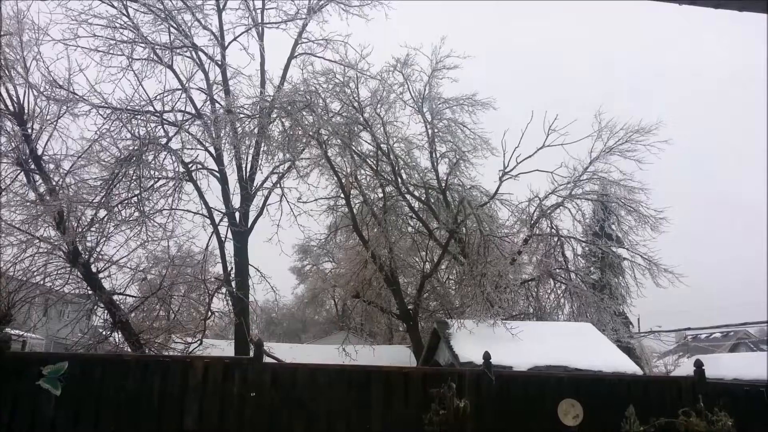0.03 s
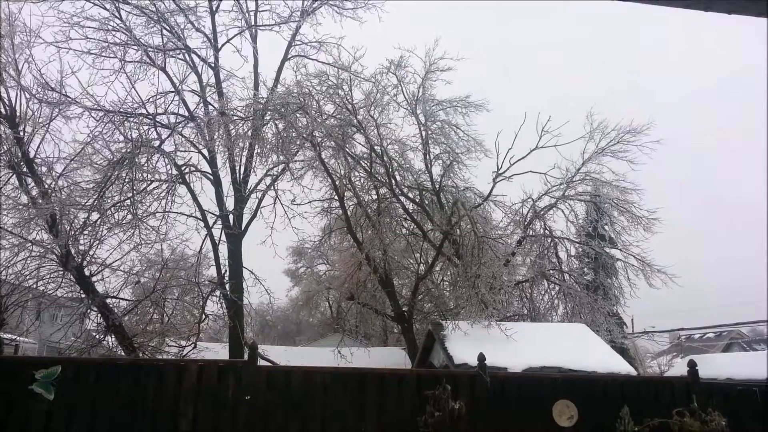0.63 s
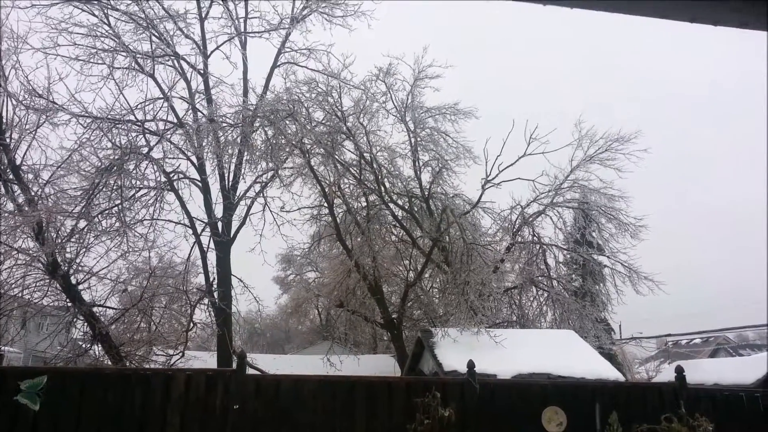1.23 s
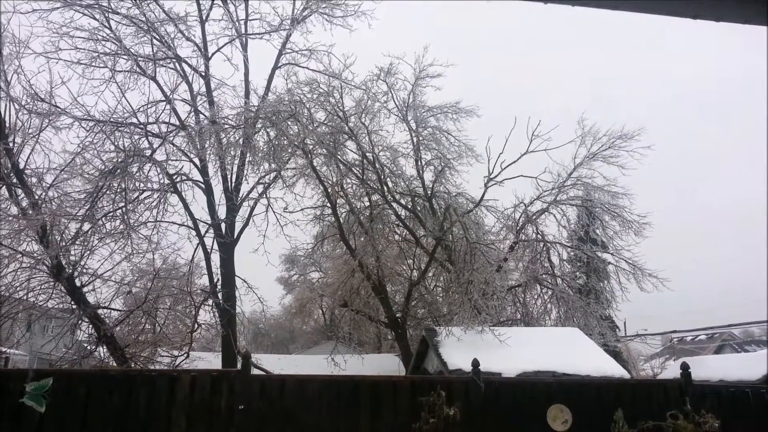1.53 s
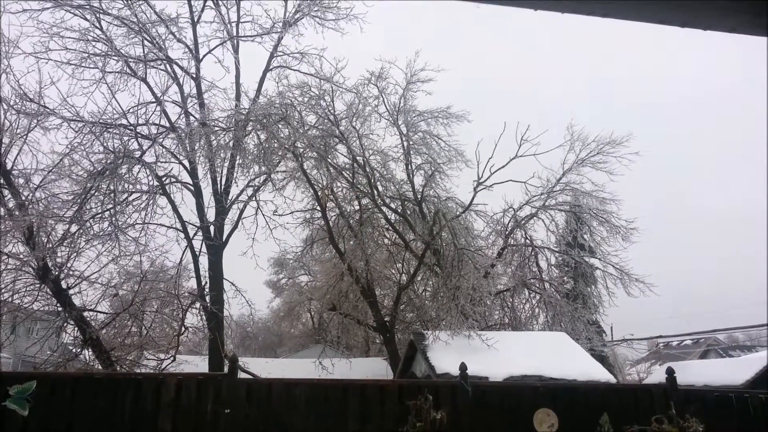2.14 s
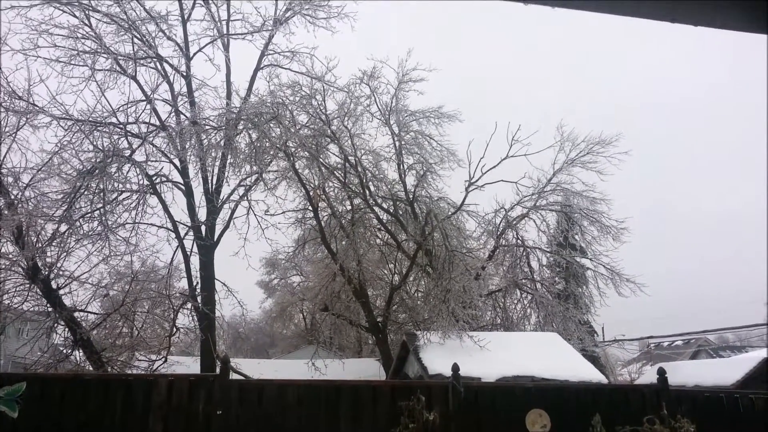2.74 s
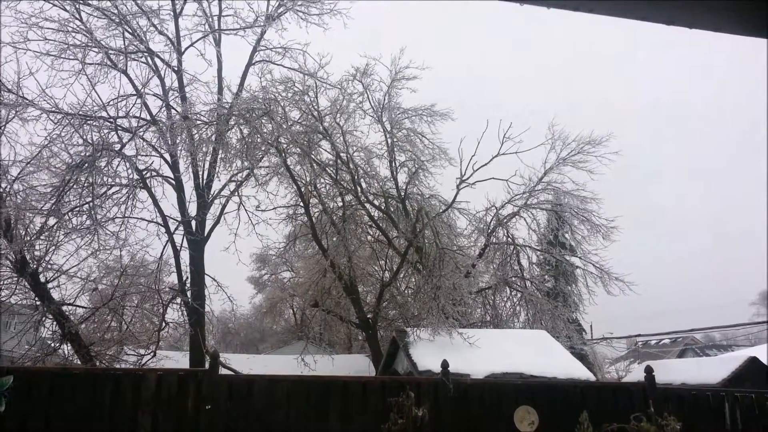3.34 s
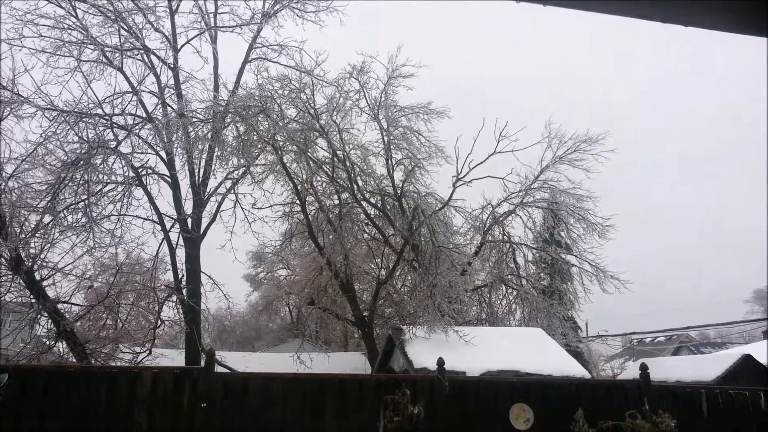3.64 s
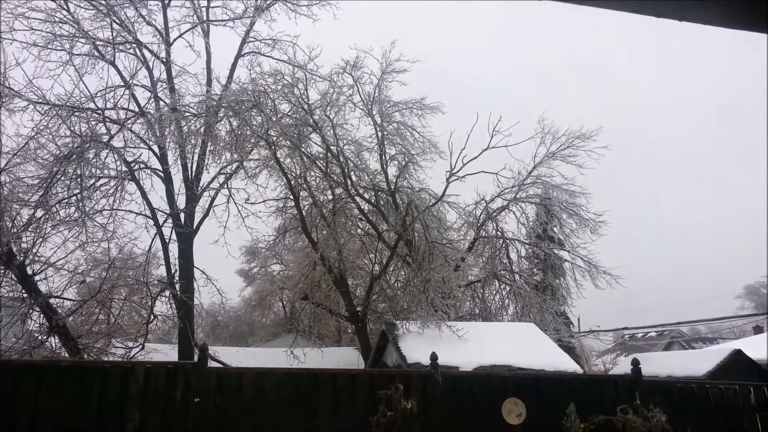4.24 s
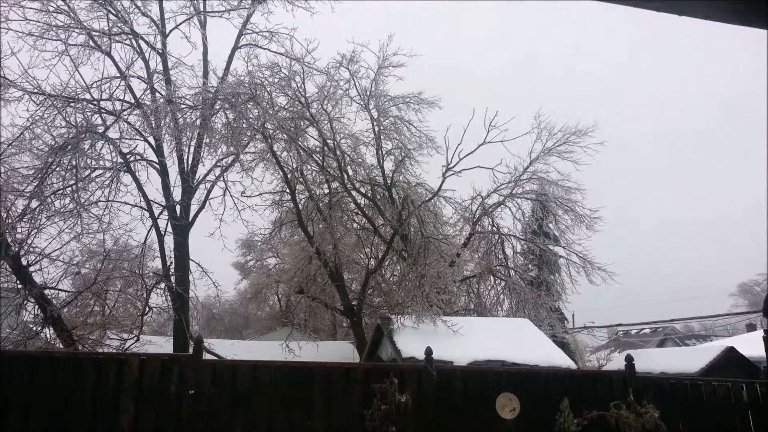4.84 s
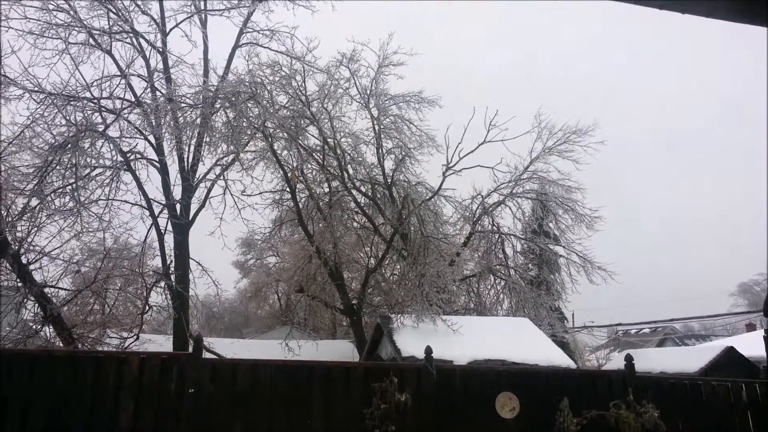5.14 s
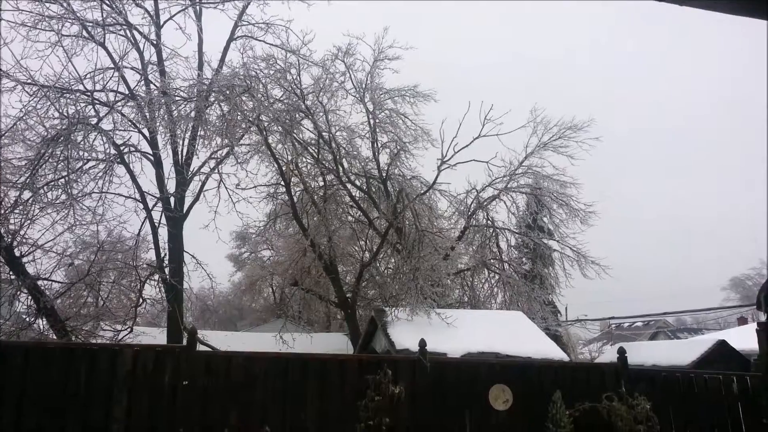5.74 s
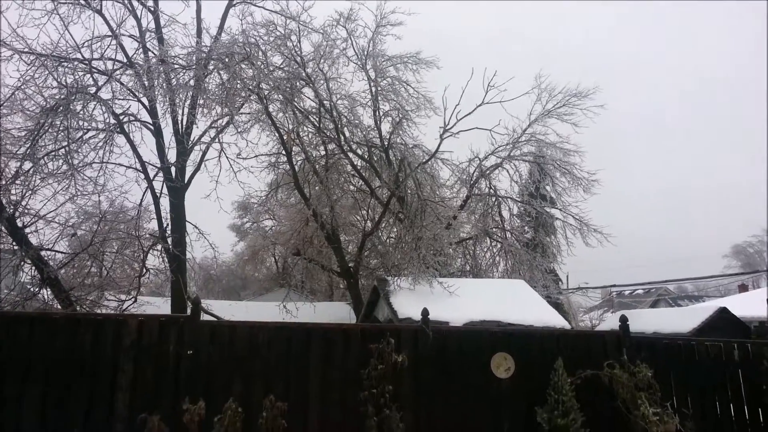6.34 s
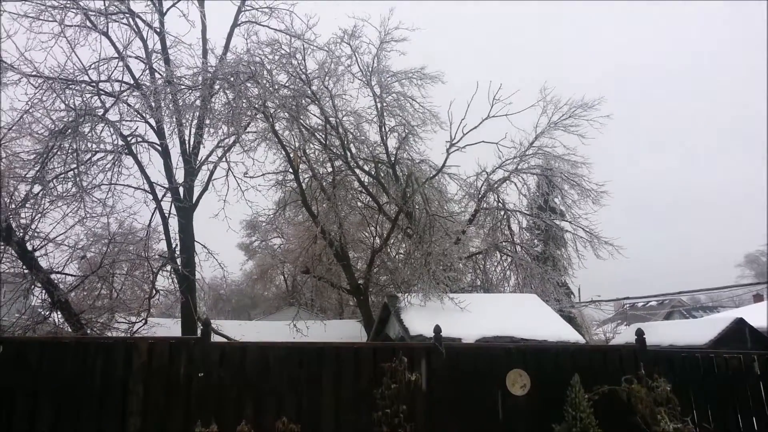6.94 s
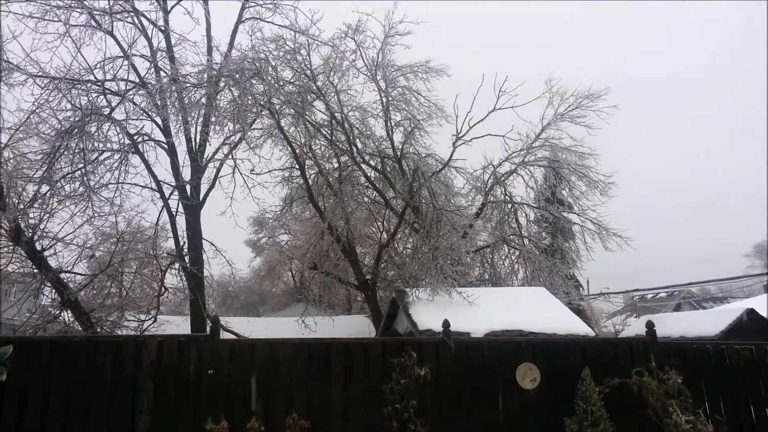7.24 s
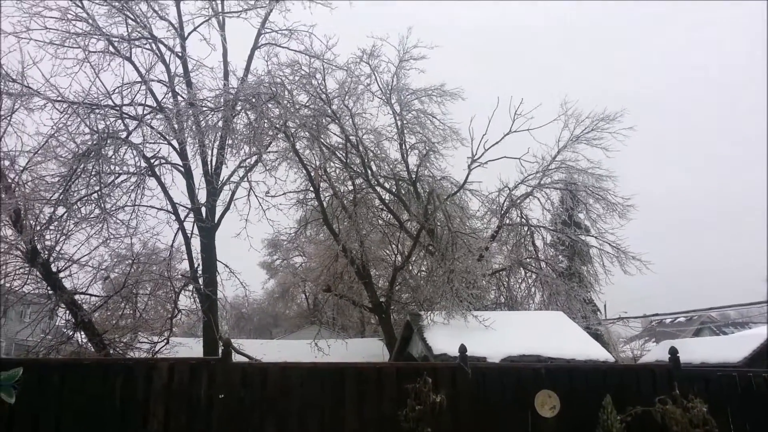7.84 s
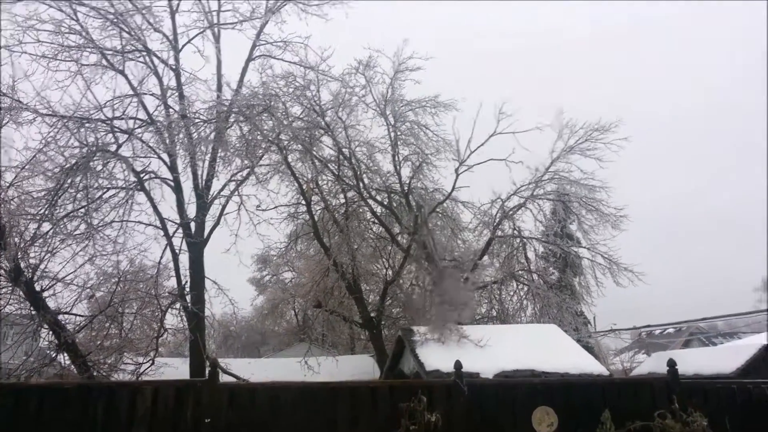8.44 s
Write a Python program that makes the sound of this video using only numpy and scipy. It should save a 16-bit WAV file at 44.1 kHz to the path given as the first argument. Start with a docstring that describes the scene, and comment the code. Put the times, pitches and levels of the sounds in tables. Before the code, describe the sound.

Sharp wood cracks echo over a faint hiss, followed by snapping icy twigs, soft thuds and one loud tearing limb break.

```python
"""Icy trees breaking behind a back yard

Heavy limbs glazed by freezing rain crack three times, the last one tearing away fibre by fibre.
In between, iced twigs snap, the glaze crackles, pellets tick and lumps of ice thud on a hollow roof.
The yard echoes the breaks, and a far engine drones faintly for a while. The left microphone port
(its sound hole) is open; the right one is covered, hears little but bass and is bumped by a finger."""
import sys
import numpy as np
from scipy import signal
from scipy.fft import rfft, irfft
from scipy.io import wavfile

SR = 44100
rng = np.random.default_rng(int(sys.argv[2]) if len(sys.argv) > 2 else 0)


def pcm_store(signal):
    """Save signal as 16-bit PCM."""
    levels = np.round(np.clip(np.atleast_2d(signal), -1, 1) * 32767)
    wavfile.write(sys.argv[1], SR, levels.astype(np.int16).T)


N = 374409

# The strongest fractures in a limb. Each row: start in seconds, level in dB, pitch in Hz.
LIMB_CRACKS = [(1.3228, -5.5, 2250), (1.3263, -6.5, 3080), (1.3345, -6.5, 2100), (1.3375, -9.5, 2680),
               (1.3629, -6.5, 2740), (1.3745, -10, 2650), (1.9445, -10, 2580), (1.9475, -12, 2720),
               (2.0484, -18, 2740), (4.2977, -20, 2190), (4.3009, -23, 2870), (4.3381, -23, 2490),
               (8.1328, -6, 1630), (8.1385, -2, 2000), (8.1523, -3, 2080), (8.1577, -5, 2060),
               (8.1688, -8, 1940), (8.1928, -7, 2520), (8.3186, -15, 2250), (8.3272, -8, 2230),
               (8.3666, -12, 2480), (8.4354, -14, 2240)]
# Breaks that shake the whole limb. Each row: start in seconds, ring level in dB, overload thud in dB.
DEEP_BREAKS = [(1.322, -32, -40), (1.334, -29, -34), (8.1255, -22, -40), (8.134, -10.5, -32)]
# Spells of tearing wood. Each row: start in seconds, level in dB, length in seconds.
TEARS = [(1.315, -21, 0.03), (1.938, -23.5, 0.031), (2.044, -29.5, 0.17), (8.127, -7, 0.029),
         (8.212, -19, 0.064), (8.32, -13.5, 0.05), (8.421, -18.5, .06)]
# Iced twigs snapping. Each row: start in seconds, level in dB, pitch in Hz,
# glassy edge in dB compared with the snap.
TWIG_SNAPS = [(1.712, -32, 2600, -18), (1.774, -35.5, 2720, -20), (1.836, -38.5, 3220, -16),
              (2.0784, -26.5, 2570, -14), (2.1345, -22.5, 3370, -17), (2.613, -32, 2700, -28),
              (2.635, -29, 2430, -35), (2.8964, -31.5, 2330, -33), (3.0303, -36, 2700, -34),
              (3.17, -30, 2650, -28), (3.1797, -27.5, 2310, -26), (3.2602, -9.5, 3240, -22),
              (3.4445, -10, 3080, -46), (3.5316, -30, 3000, -15), (3.5688, -31.5, 2540, -26),
              (3.6667, -32, 3470, -26), (3.878, -33, 3300, -41), (3.8867, -33, 3600, -14.5),
              (3.93, -17, 4000, -27), (4.3911, -31, 3570, -29), (4.4375, -29.5, 3500, -23),
              (4.5441, -28.5, 3450, -23), (4.6162, -20, 3660, -21), (5.1842, -30.5, 2830, -20),
              (5.369, -34.5, 3900, -15), (5.4958, -32, 3880, -11), (5.55, -33, 3400, -23),
              (5.6817, -31.5, 3450, -23), (5.736, -17.5, 4060, -19), (5.7954, -32, 3060, -20),
              (6.1268, -17.5, 3860, -10.5), (6.2229, -22, 4100, -19), (6.5947, -27.5, 4200, -18.5),
              (6.784, -16, 3800, -17.5), (7.1001, -38.5, 3780, -15)]
# Steady crackling of the glaze, swelling after the first breaks. Each row: time in seconds, level in dB.
CRACKLE_LEVELS = [(0.35, -60), (1.3, -59.5), (1.42, -58), (1.78, -42.5), (1.88, -48), (2.35, -45),
                  (2.58, -34.5), (2.85, -43.5), (3.55, -38.5), (4.03, -38.5), (4.2, -41.5), (4.7, -45),
                  (5.18, -42), (6.5, -45), (7.5, -45.5), (8.0, -41.5)]
# The nearest ice pellets landing. Each row: start in seconds, level in dB.
PELLETS = [(0.2866, -46), (0.4182, -48), (0.597, -49), (1.627, -43), (2.0484, -40), (2.152, -43),
           (2.2516, -38), (3.194, -40), (3.4965, -41), (4.0232, -43), (4.1326, -35), (5.3834, -35),
           (5.7686, -37), (5.9209, -45), (6.0182, -42), (6.1764, -43), (6.2097, -39), (6.2424, -40),
           (6.3069, -43), (6.5382, -36), (6.7485, -44), (6.882, -41), (7.4086, -44), (7.4623, -44),
           (7.5615, -46), (7.6624, -30), (7.9537, -46), (8.0806, -32)]
# Lumps of ice hitting the roof. Each row: start in seconds, boom level in dB, clatter level in dB.
ROOF_THUDS = [(0.519, -48.5, -50), (0.779, -41.5, -73), (1.584, -45.5, -50), (2.192, -44.5, -44.5),
              (2.4, -39.5, -38.5), (2.929, -45, -49.5), (3.358, -44.5, -54), (3.72, -47.5, -50),
              (3.96, -43, -44.5), (4.012, -55, -44), (4.159, -47, -46), (4.317, -50.5, -51),
              (4.361, -45.5, -49), (4.628, -50.5, -50), (5.078, -44.5, -52), (5.879, -46, -54),
              (6.813, -47, -54), (6.898, -46.5, -49), (7.798, -59, -49), (7.978, -46, -48.5),
              (8.36, -30.5, -44), (8.394, -37.5, -46)]
# A finger bumping the covered port. Each row: start in seconds, peak level in dB.
FINGER_BUMPS = [(1.083, -31), (6.095, -31), (6.1004, -23.5)]
# The far engine swelling and fading. Each row: time in seconds, level in dB.
ENGINE_LEVELS = [(5.9, -80), (6.2, -59), (6.8, -66), (7.6, -74), (8.0, -78)]

# The notes a struck object rings at. Each row: pitch in Hz, level in dB, seconds to fade by 60 dB.
LIMB_MODES = [(610, -3, .035), (760, -6, .035), (1018, -1, .07), (1220, -11, .1), (1547, -11, .1),
              (1955, -5, .1)]
ROOF_MODES = [(166, 0, .13), (200, 0, .14), (228, -5, .1), (273, -2.5, .16), (318, -11, .08)]
# How long the yard echoes. Each row: frequency in Hz, seconds to fade by 60 dB.
YARD_FADE_TIMES = [(200, 0.45), (1000, 0.64), (2500, 0.74), (6000, 0.45), (14000, 2.43)]

# Tone curves, from bass to treble. Each row: frequency in Hz, level in dB.
WOOD_TONE = [(40, -29), (200, -41), (500, -18), (900, 1.5), (1400, 6.5), (2000, 4), (3000, -2.5), (4000, 2),
             (5200, -13), (7500, -18), (11000, -13), (15000, -25)]  # thick wood cracking
FIBRE_TONE = [(60, -63), (400, 2.5), (900, -5.5), (1400, 1), (2100, 6), (3000, 4.5), (4000, -1.5),
              (5300, -10.5), (8000, -12.5), (11000, -24), (15000, -24)]  # wood fibres tearing
TWIG_TONE = [(100, -47), (900, -18), (1500, -2.5), (2300, 0), (4100, -2), (4800, -1.5), (5800, -10),
             (15000, -70)]  # a thin twig snapping
SHARD_TONE = [(300, -35), (2500, -11), (4000, -3), (5600, -1.5), (7500, 2), (9500, 0.5), (11500, -8),
              (14500, -5)]  # the ice coat bursting off a twig
GLAZE_TONE = [(80, -15.5), (400, -4.5), (900, -5), (1400, -4), (2100, 1), (3000, -2), (3900, 1), (4700, -8),
              (5700, -16), (8000, -15), (11000, -21), (15000, -19)]  # ice crackling in the treetops
GLASSY_TONE = [(300, -35), (2500, -13), (4000, -5), (5600, -6), (7500, 0), (10000, 0), (14500, -2)]  # pellets landing, and the treble sizzle
CLATTER_TONE = [(60, -44), (150, 1), (400, -5), (650, 16.5), (1400, 8.5), (2200, 10), (4000, -17),
                (9000, -65)]  # a lump of ice breaking up
OPEN_AIR_TONE = [(20, -52), (60, -17), (120, -13.5), (240, -4.5), (400, -10.5), (1000, -11.5), (2500, -13),
                 (4000, -16), (6000, -31), (10000, -26), (14500, -25)]  # background at the open port
COVERED_AIR_TONE = [(20, -31), (60, -5.5), (120, 2.5), (250, -5.5), (500, -10), (1000, -17.5),
                    (2500, -23.5), (4000, -24.5), (6000, -29), (10000, -26), (14500, -26.5)]  # background at the covered port
COVER_MUFFLING = [(30, -8), (160, 0), (300, -4), (600, -10), (1000, -14), (1400, -22), (2000, -35),
                  (3500, -37), (6000, -35), (15000, -37)]  # the covered port compared with the open one

TEAR_ATTACK_S, TEAR_SAG_DB_PER_S, TEAR_RELEASE_DB_PER_S = .005, 60, 299
STRAY_FIBRES_DB, STRAY_RELEASE_DB_PER_S = -12, 47
FLURRY_DB, FLURRY_ATTACK_S, FLURRY_RELEASE_DB_PER_S = -12, 0.022, 89  # level relative to the scatter
SIZZLE_DB, SIZZLE_ATTACK_S, SIZZLE_RELEASE_DB_PER_S = -77, .08, 9
START_S, CUTOFF_HZ = .1, 14500


def limb_cracks():
    """Thick wood breaks with a low crack, a few vibrations long, that scatters through the treetop."""
    out = np.zeros(N)
    for s, db, hz in LIMB_CRACKS:
        fracture = resonate(rupture(.0013, splinter_db=4), hz, width_hz=1020)
        shower = resonate(burst(0.019, uneven_db=15.5), hz, width_hz=710)
        direct = level_one(colour(fracture, WOOD_TONE), over_s=0.0029)
        scatter = level_one(colour(shower, WOOD_TONE), over_s=0.002)
        add(out, s, from_db(db) * (direct + from_db(-6) * scatter))
    return out


def deep_breaks():
    """The limb rings like a log as its core gives way; a low thud imitates the recorder overloading."""
    out = np.zeros(N)
    for s, ring_db, overload_db in DEEP_BREAKS:
        blow = rupture(0.001, splinter_db=20)
        ringing = level_one(ring(blow, LIMB_MODES), over_s=0.03)
        overload_thud = level_one(resonate(blow, 170, width_hz=300), over_s=.005)
        add(out, s, from_db(ring_db) * ringing + from_db(overload_db) * overload_thud)
    return out


def tearing():
    """Fibre after fibre gives way: each tear weakens as the strain is spent, then a few strays follow."""
    fibres = grains(6000, spread_db=3.4, clump_db=2.0, width_hz=1800)
    power = np.zeros(N)
    for s, db, length_s in TEARS:
        tear = envelope(s, TEAR_ATTACK_S, TEAR_RELEASE_DB_PER_S, length_s, TEAR_SAG_DB_PER_S)
        strays = from_db(STRAY_FIBRES_DB) * envelope(s, TEAR_ATTACK_S, STRAY_RELEASE_DB_PER_S)
        power += from_db(db) ** 2 * (tear ** 2 + strays ** 2)
    return np.sqrt(power) * rms_one(colour(fibres, FIBRE_TONE))


def twig_snaps():
    """A thin twig rings for an instant, its ice adds a glassy edge and nearby twigs scatter the snap."""
    out = np.zeros(N)
    for s, db, hz, edge_db in TWIG_SNAPS:
        fracture = resonate(rupture(.0006, splinter_db=-3), hz, width_hz=730)
        shards = rupture(.008, splinter_db=3)
        shower = resonate(burst(0.015, uneven_db=7), hz, width_hz=1450)
        direct = level_one(colour(fracture, TWIG_TONE), over_s=0.0035)
        edge = level_one(colour(shards, SHARD_TONE), over_s=0.02)
        scatter = level_one(colour(shower, TWIG_TONE), over_s=0.032)
        snap = from_db(db) * (direct + from_db(edge_db) * edge)
        add(out, s, snap + from_db(scatter_db(db)) * scatter)
    return out


def scatter_db(snap_db):
    """A harder snap stirs the nearby twigs more, but not in proportion."""
    return -20 + 0.71 * snap_db


def glaze_crackling():
    """Ice cracks all over the swaying treetops, with a flurry after each snap; far trees just hiss."""
    near = grains(2200, spread_db=2.0, clump_db=5.0, width_hz=810)
    far = rng.standard_normal(N) * from_db(drift(25))
    trees = near + from_db(-1.5) * far
    power = from_db(in_time(CRACKLE_LEVELS)) ** 2
    for s, db, *_ in TWIG_SNAPS:
        flurry = envelope(s, FLURRY_ATTACK_S, FLURRY_RELEASE_DB_PER_S)
        power += (from_db(scatter_db(db) + FLURRY_DB) * flurry) ** 2
    return np.sqrt(power) * rms_one(colour(trees, GLAZE_TONE))


def pellets():
    """Hard little grains of ice land with a bright tick and skitter."""
    out = np.zeros(N)
    for s, db in PELLETS:
        tick = colour(rupture(.008, splinter_db=2), GLASSY_TONE)
        add(out, s, from_db(db) * level_one(tick, over_s=.007))
    return out


def roof_thuds():
    """A lump of ice breaks up as it lands: the hollow roof booms under a short clatter."""
    out = np.zeros(N)
    soft_start = 1 - np.exp(-np.arange(6000) / SR / .0025)
    for s, boom_db, clatter_db in ROOF_THUDS:
        boom = ring(soft_start * burst(0.0099, uneven_db=3.5), ROOF_MODES)
        clatter = colour(soft_start * burst(0.012, uneven_db=8), CLATTER_TONE)
        add(out, s, from_db(boom_db) * level_one(boom, over_s=0.046))
        add(out, s, from_db(clatter_db) * level_one(clatter, over_s=0.1))
    return out


def finger_bumps():
    """A finger knocks dully against the covered port."""
    out = np.zeros(N)
    for s, db in FINGER_BUMPS:
        touch = rupture(0.0016, splinter_db=-41)
        knock = colour(resonate(touch, 430, width_hz=2000), COVER_MUFFLING)
        add(out, s, from_db(db) * knock / np.abs(knock).max())
    return out


def treble_sizzle():
    """A faint high hiss lingers after each tear."""
    power = sum(envelope(s, SIZZLE_ATTACK_S, SIZZLE_RELEASE_DB_PER_S) ** 2 for s, *_ in TEARS)
    hiss = grains(5000, spread_db=2.0, clump_db=2.0, width_hz=4000)
    return from_db(SIZZLE_DB) * np.sqrt(power) * rms_one(colour(hiss, GLASSY_TONE))


def sleet():
    """Fainter pellets land all around, blurred by distance."""
    ticks = grains(60, spread_db=11.0, clump_db=6.5, width_hz=1800)
    blurred = signal.oaconvolve(ticks, burst(0.008, uneven_db=4))[:N]
    return from_db(-72.0) * rms_one(colour(blurred, GLASSY_TONE))


def yard_echoes(x, bands=8):
    """Trees, fences and houses send back grainy echoes; each band of pitches fades at its own speed."""
    t = np.arange(SR) / SR
    edges_hz = np.geomspace(80, 17000, bands + 1)
    echo_sizes = from_db(4.5 * np.repeat(rng.standard_normal(SR), 40)[:SR])
    tail = np.zeros(SR)
    for low, high in zip(edges_hz, edges_hz[1:]):
        band_pass = signal.butter(2, [low, high], "band", fs=SR, output="sos")
        band = signal.sosfilt(band_pass, echo_sizes * rng.standard_normal(SR))
        fade_s = at_hz(YARD_FADE_TIMES, np.sqrt(low * high))
        tail += band * np.exp(-np.log(1000) * t / fade_s)
    tail *= 1 - np.exp(-t / 0.0034)  # the echoes take a moment to build up
    return signal.oaconvolve(x, tail / np.linalg.norm(tail))[:N]


def far_engine():
    """Only the lowest note of the engine carries this far."""
    rumble = resonate(rng.standard_normal(N), hz=84, width_hz=18)
    note = resonate(rumble, hz=84, width_hz=18)
    return from_db(in_time(ENGINE_LEVELS)) * rms_one(note)


def air(tone, db):
    """Steady distant rumble and hiss."""
    return from_db(db) * rms_one(colour(rng.standard_normal(N), tone))


def rupture(decay_s, splinter_db):
    """One sharp click as the strain lets go, followed by the splinters that it sets off."""
    splinters = burst(decay_s, uneven_db=7)
    clicks = from_db(splinter_db) * splinters / np.linalg.norm(splinters)
    clicks[0] += 1
    return clicks * rng.choice([-1, 1])


def burst(decay_s, uneven_db, size=6000):
    """A dying shower of tiny clicks of uneven size."""
    clicks = rng.standard_normal(size) * from_db(uneven_db * rng.standard_normal(size))
    return clicks * np.exp(-np.arange(size) / SR / decay_s)


def grains(per_s, spread_db, clump_db, width_hz, count=12):
    """Many small clicks, swelling in clumps, each ringing briefly at one of several pitches."""
    sizes = from_db(spread_db * np.minimum(rng.exponential(1, N), 4))
    signs = rng.choice([-1, 1], N)
    happens = rng.random(N) < per_s / SR
    clicks = sizes * signs * happens * from_db(clump_db * drift(45))
    pitch_choice = rng.integers(0, count, N)
    rings = sum(resonate(clicks * (pitch_choice == k), hz, width_hz * np.sqrt(hz / 3000))
                for k, hz in enumerate(np.geomspace(900, 12000, count)))
    return rms_one(rms_one(rings) + from_db(-5) * rms_one(clicks))


def ring(blow, modes):
    """A struck object rings at all of its natural notes together."""
    return sum(from_db(db) * level_one(resonate(blow, hz, np.log(1000) / np.pi / fade_s), over_s=1)
               for hz, db, fade_s in modes)


def resonate(x, hz, width_hz):
    """Make a sound ring at one pitch; a narrower width rings longer."""
    r = np.exp(-np.pi * width_hz / SR)
    feedback = [1, -2 * r * np.cos(2 * np.pi * hz / SR), r * r]
    return signal.lfilter(np.array([1, 0, -1]) * (1 - r * r) / 2, feedback, x + 1e-18)


def colour(x, tone, size=2048):
    """Shape the bass and treble of a sound with a tone curve."""
    gains = from_db(at_hz(tone, np.arange(size // 2 + 1) * SR / size))
    cepstrum = irfft(np.log(gains))
    # Folding the second half onto the first keeps the filter from ringing before a click arrives.
    cepstrum[1:size // 2] *= 2
    cepstrum[size // 2 + 1:] = 0
    click_response = irfft(np.exp(rfft(cepstrum)))[:size // 2]
    return signal.oaconvolve(x, click_response)[:len(x)]


def envelope(s, attack_s, release_db_per_s, hold_s=0, sag_db_per_s=0):
    """A loudness curve that rises at s seconds, sags while it is held, then fades away."""
    t = np.maximum(np.arange(N) / SR - s, 0)
    fall_db = sag_db_per_s * np.minimum(t, hold_s) + release_db_per_s * np.maximum(t - hold_s, 0)
    return np.minimum(t / attack_s, 1) * from_db(-np.minimum(fall_db, 120))


def drift(per_s):
    """A wandering curve that glides to a new random value per_s times a second."""
    values = rng.standard_normal(4096)
    return np.interp(np.arange(N) / SR * per_s, np.arange(len(values)), values)


def in_time(rows):
    """Join rows of time and value with straight lines, giving a value for every sample."""
    return np.interp(np.arange(N) / SR, *np.transpose(rows))


def at_hz(points, hz):
    """Read a curve at any frequency, with the octaves evenly spaced."""
    known_hz, values = np.transpose(points)
    return np.interp(np.log(np.maximum(hz, 1)), np.log(known_hz), values)


def from_db(db):
    """Turn decibels into a number to multiply by."""
    return 10 ** (np.asarray(db) / 20)


def rms_one(x):
    """Scale a sound so that its average strength (rms) is 1."""
    return x / np.sqrt(np.mean(x ** 2) + 1e-20)


def level_one(x, over_s):
    """Scale a short sound so that its energy, spread over this time, has an average strength of 1."""
    return x * np.sqrt(over_s * SR / (np.sum(x ** 2) + 1e-20))


def add(track, s, sound):
    """Mix a sound into a track, starting at s seconds."""
    start = int(round(s * SR))
    track[start:start + len(sound)] += sound[:max(len(track) - start, 0)]


def scene():
    """All the sounds as they reach the open port on the left and the covered port on the right."""
    limbs = limb_cracks() + deep_breaks() + tearing()
    ice = twig_snaps() + pellets()
    echoes = yard_echoes(from_db(-7.0) * limbs + from_db(-20.0) * ice)
    outdoors = limbs + ice + echoes + glaze_crackling() + treble_sizzle() + sleet()
    outdoors += roof_thuds() + far_engine()
    bumps = finger_bumps()
    lag = int(.0003 * SR)  # the covered port lies farther from the trees
    delayed = np.pad(outdoors, (lag, 0))[:N]
    left = outdoors + air(OPEN_AIR_TONE, db=-51.5)
    right = colour(delayed, COVER_MUFFLING) + air(COVERED_AIR_TONE, db=-52.5) + bumps
    return np.array([left, right])


def record(dry):
    """The recorder opens after a moment, overloads on the loudest cracks and cuts the highest treble."""
    opened = np.arange(N) / SR > START_S
    overloaded = np.clip(dry * opened, -1, 1)
    low_pass = signal.ellip(10, .1, 80, CUTOFF_HZ, fs=SR, output="sos")
    return signal.sosfilt(low_pass, overloaded)


dry = scene()
out = record(dry)
pcm_store(out)
```